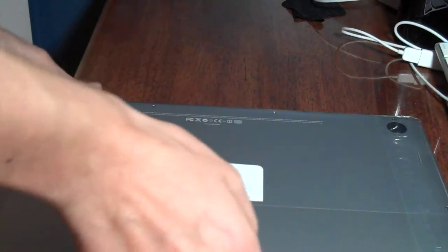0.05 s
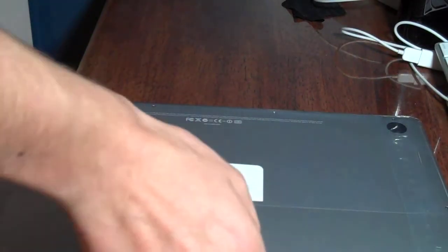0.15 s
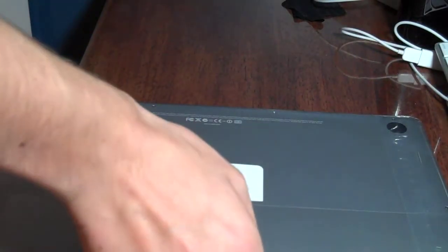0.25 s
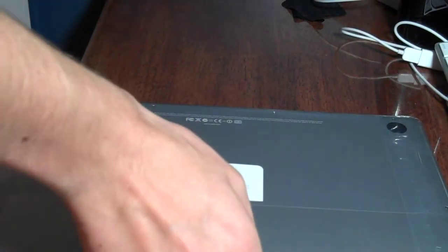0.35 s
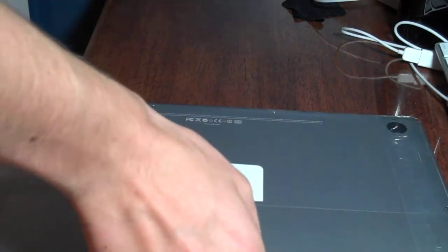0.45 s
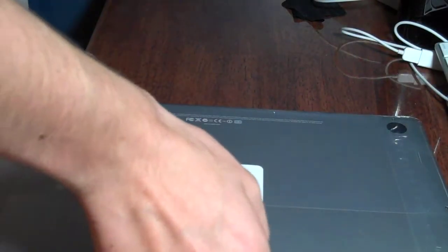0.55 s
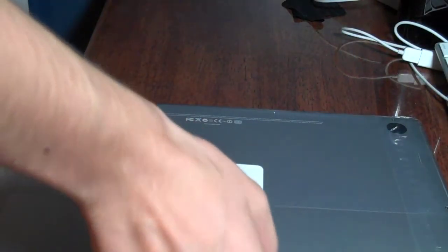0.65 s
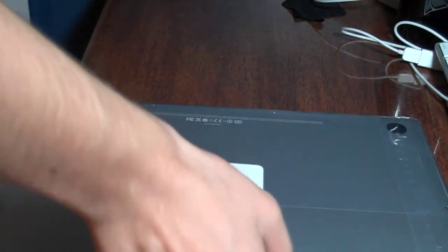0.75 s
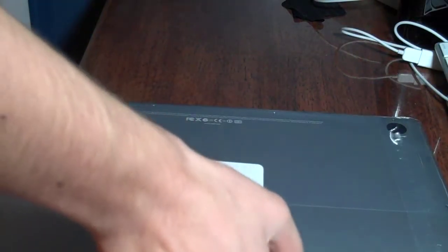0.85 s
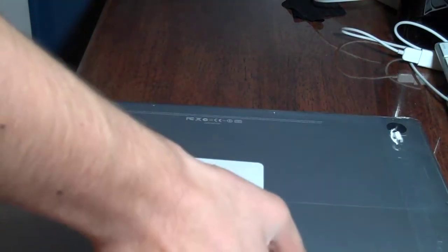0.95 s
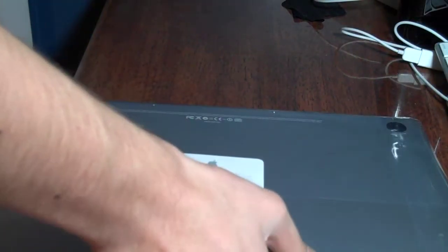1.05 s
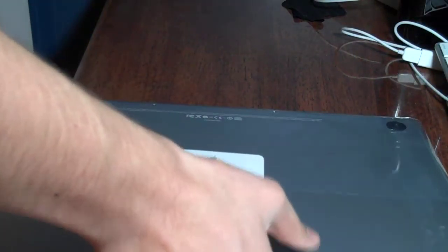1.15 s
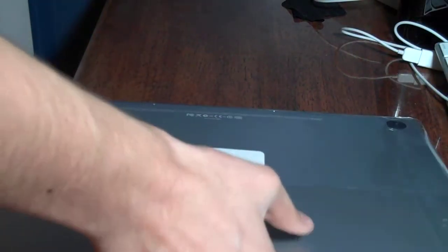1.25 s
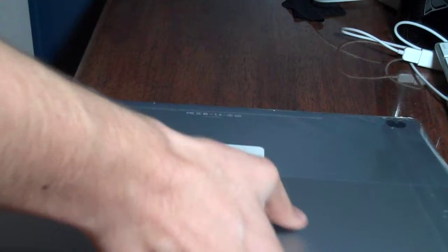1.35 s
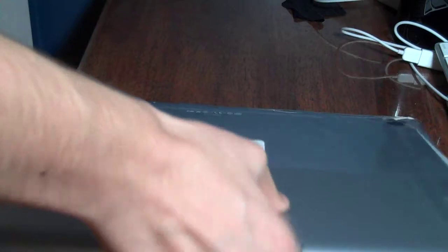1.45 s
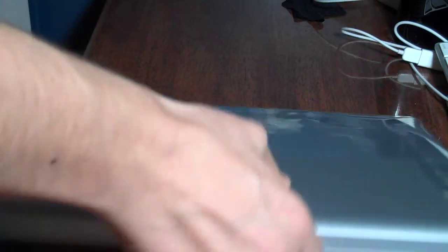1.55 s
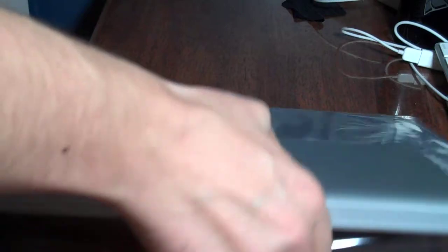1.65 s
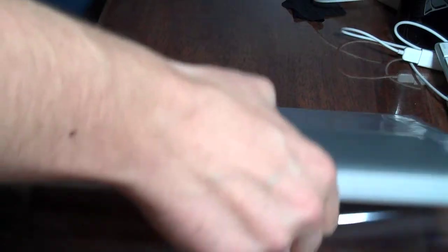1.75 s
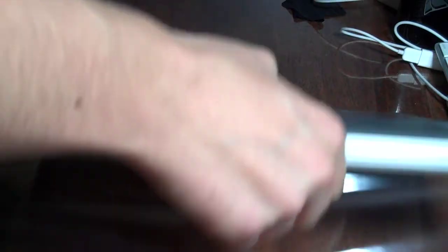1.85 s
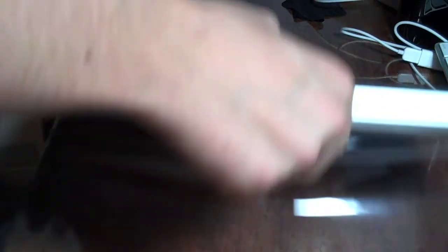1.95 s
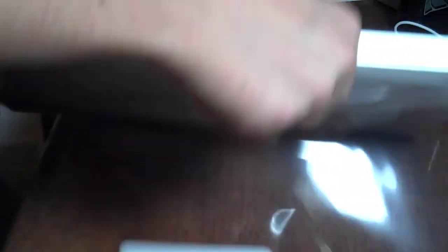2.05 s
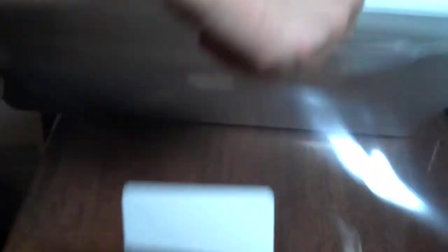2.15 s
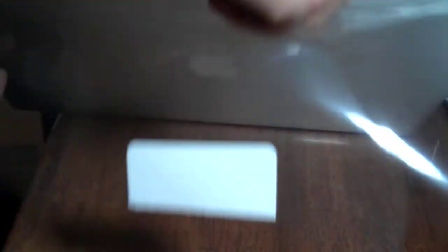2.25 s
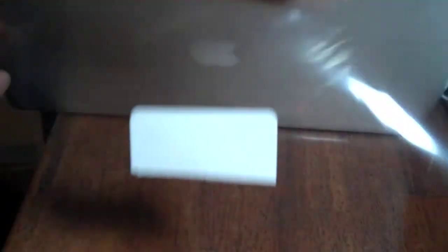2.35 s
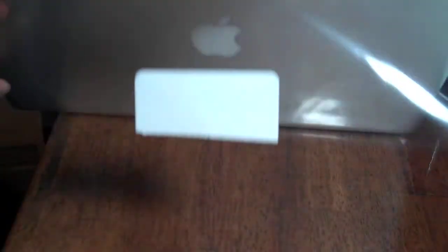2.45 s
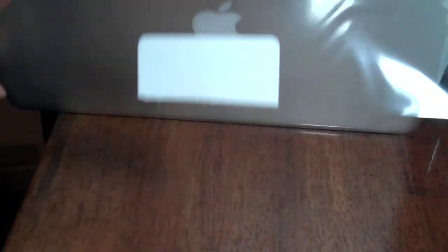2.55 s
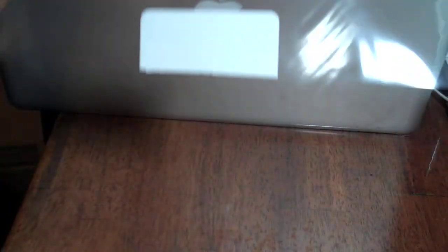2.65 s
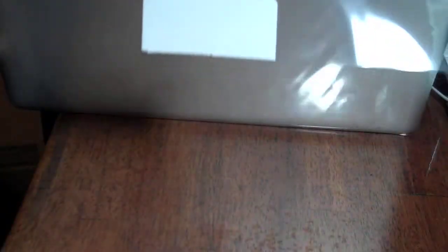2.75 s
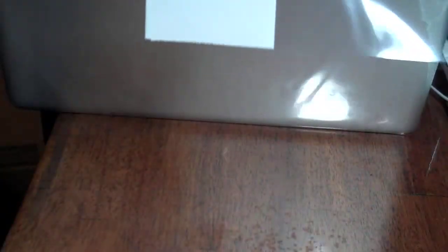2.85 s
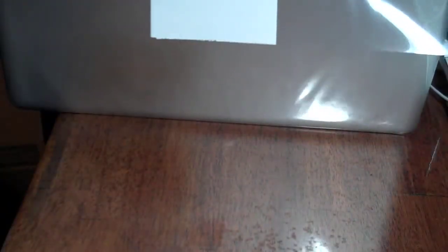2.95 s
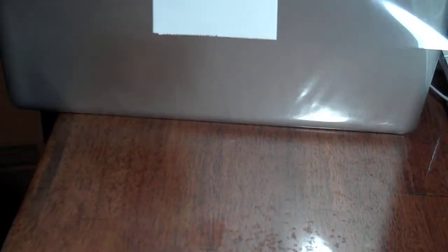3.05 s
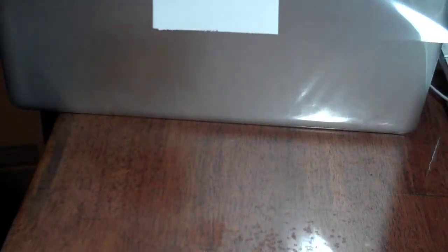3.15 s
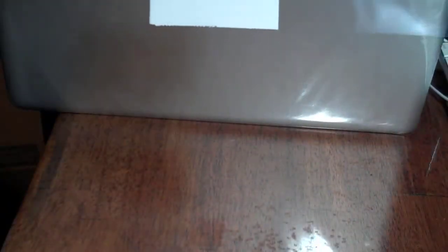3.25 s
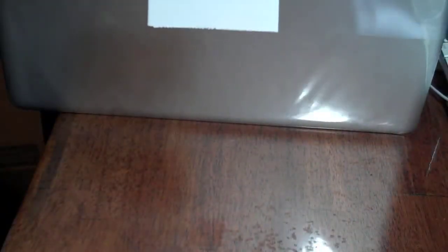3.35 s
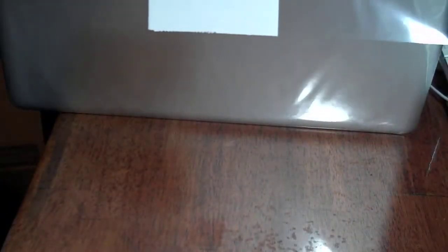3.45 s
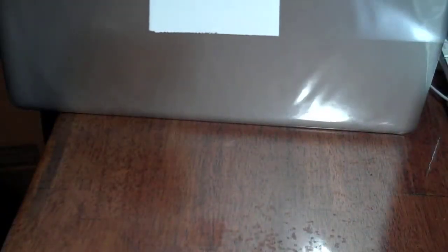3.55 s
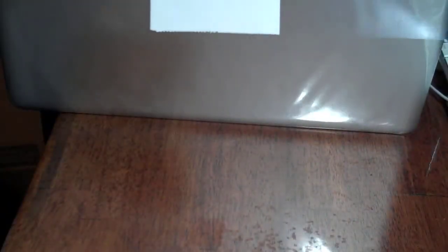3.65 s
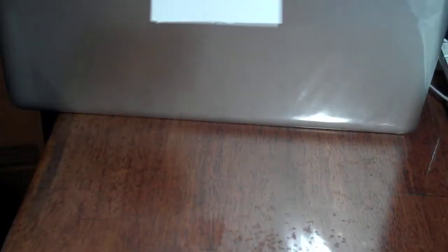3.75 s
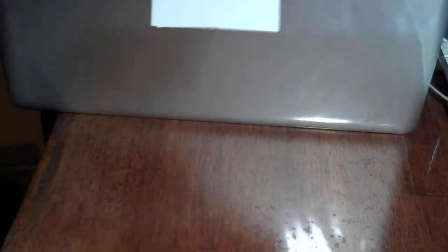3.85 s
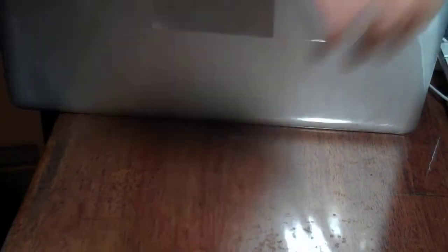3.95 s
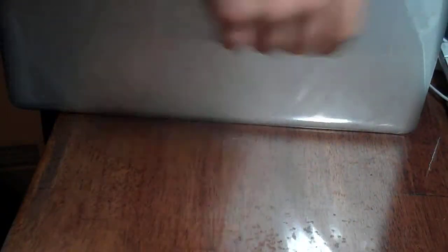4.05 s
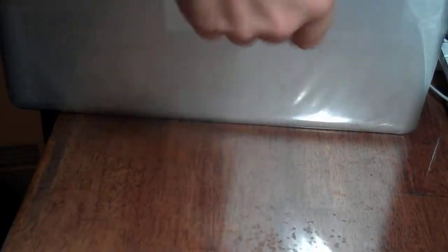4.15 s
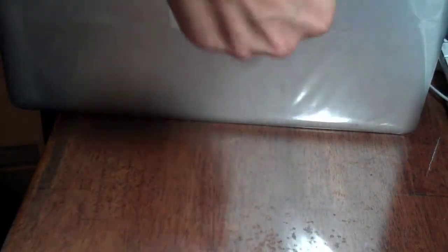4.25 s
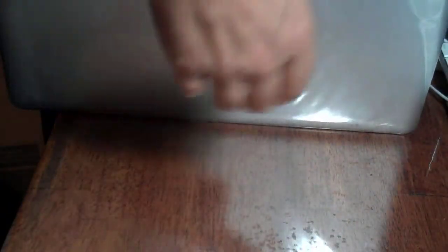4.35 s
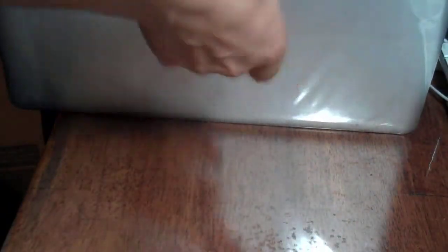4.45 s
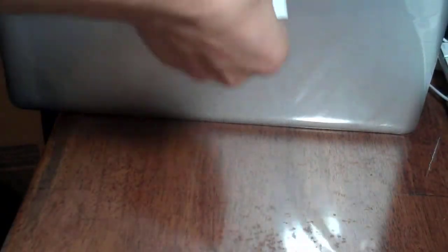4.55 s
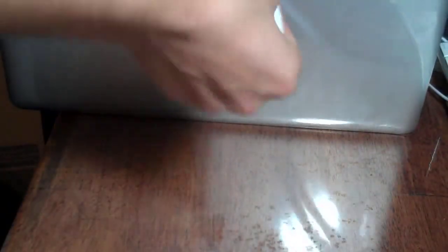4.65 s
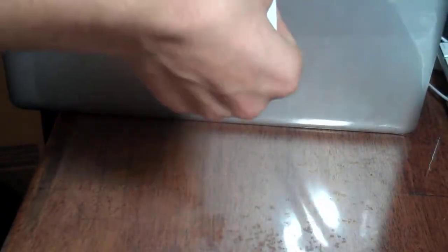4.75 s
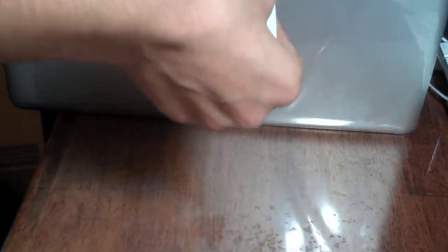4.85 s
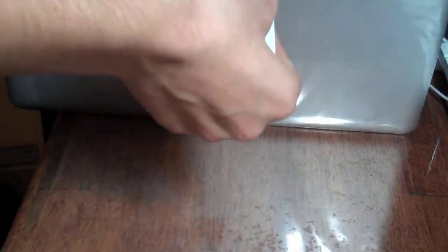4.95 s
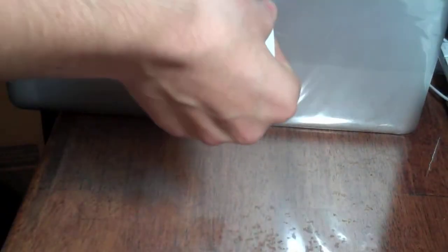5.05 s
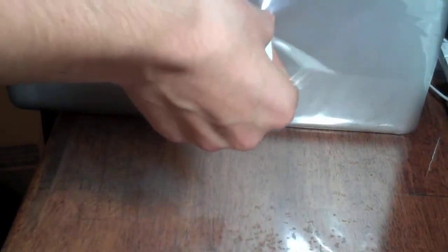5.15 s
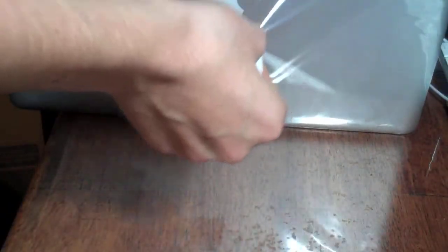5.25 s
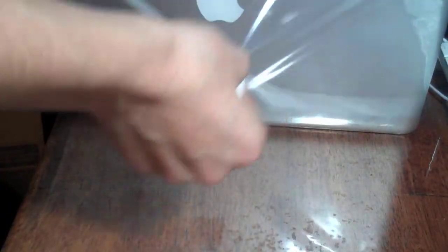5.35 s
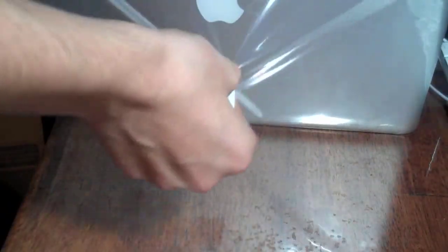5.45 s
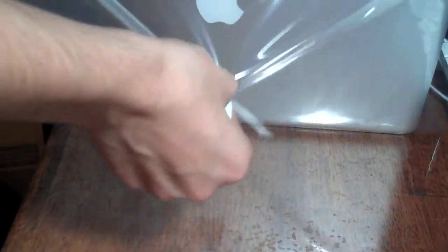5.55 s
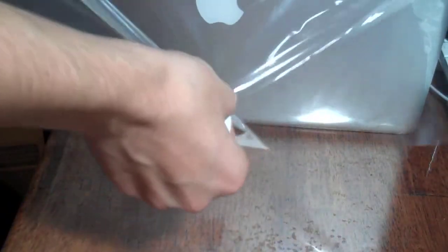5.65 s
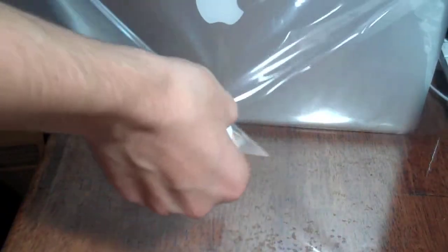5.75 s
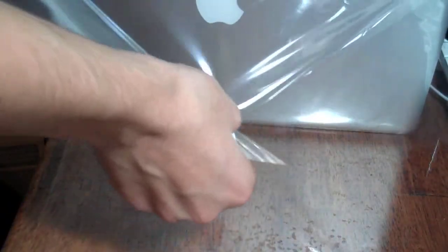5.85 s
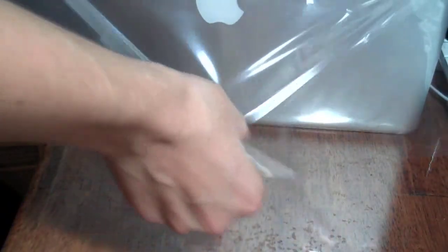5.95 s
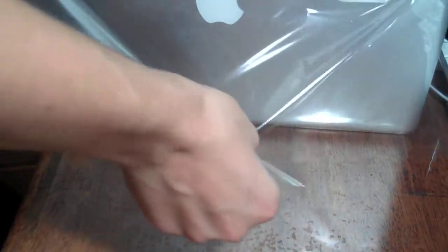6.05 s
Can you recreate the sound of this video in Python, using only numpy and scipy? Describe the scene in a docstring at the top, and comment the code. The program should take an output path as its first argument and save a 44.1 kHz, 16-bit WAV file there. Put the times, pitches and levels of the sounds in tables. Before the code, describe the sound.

Close to the microphone in a quiet room, hands work at the stiff plastic film on a laptop. Light ticks and rustles lead to a cluster of sharp crackles. The laptop rubs softly over a wooden desk and gives a short rising squeak. After a lull come more snaps and a quick falling squeak, then the film is pulled away in dense, crisp crinkling.

```python
"""Stiff clear film snaps and rustles as it is lifted off a laptop, rubbed and pulled near a microphone.
Creases give way in bursts of a few ms; friction hisses between them. Skin and film stick, slip
and squeak; the laptop's edge drags over the wooden desk. The metal shell rings along.
Behind: short reflections, quiet room tone, faint hum. The input's baseline jumps and settles."""
import sys
import numpy as np
from scipy import signal
from scipy.fft import rfft, irfft
from scipy.io import wavfile
from scipy.ndimage import uniform_filter1d

SR = 44100
rng = np.random.default_rng(int(sys.argv[2]) if len(sys.argv) > 2 else 0)


def digitize_waveform(pressure):
    """Quantize a signal to 16-bit integers and store it at the path in sys.argv[1].

    Rows of a 2-D input are taken as channels; values are limited to [-1, 1].
    """
    field = np.atleast_2d(pressure).T
    bounded = np.clip(field, -1, 1)
    quanta = np.round(bounded * 32767).astype(np.int16)
    wavfile.write(sys.argv[1], SR, quanta)


N = 269451

# crease snaps: t/s, peak energy/(dB per ms), centre/Hz, width/oct, thump energy/(dB per ms), burst/ms
CREASES = [(0.0007, -38, 2800, 1.2, -56, 10), (0.1971, -42, 5200, 2.3, -54, 8.4),
           (0.2124, -27.5, 4100, 1.02, -67, 2.7), (0.2343, -41.5, 3120, 1.7, -58, 2),
           (0.2462, -48, 2200, 1.8, -63, 5), (0.2914, -51, 3800, 1.5, -69, 1.2),
           (0.3002, -35.5, 5000, 0.76, -55, 0.47), (0.3067, -43, 4400, 2.3, -69, 1.9),
           (0.3342, -52, 2600, 1.7, -67, 2.6), (0.407, -53, 16400, 1.6, -58, 1.5),
           (0.523, -49, 16400, 1.8, -63, 29), (0.6126, -44.5, 12400, 1.2, -60, 1.4),
           (0.6861, -43, 6900, 1.74, -56, 0.57), (0.81, -59, 10600, 3, -74, 1.0),
           (0.8785, -53.5, 7000, 2.7, -78, 1.1), (0.9701, -39, 6100, 2.04, -54, 1.2),
           (1.0618, -41, 16400, 1.76, -76, 6.6), (1.1405, -48, 3370, 1.8, -69, 3.8),
           (1.1612, -46, 1320, 2, -91, 6.3), (1.1772, -37.5, 3640, 1.3, -66, 3.1),
           (1.1996, -19, 2860, 1.48, -33.5, 3.5), (1.209, -39, 2200, 4.4, -52, 1.4),
           (1.2196, -38, 6100, 3.1, -50, 2.2), (1.2585, -31, 6000, 1.56, -59, 1.7),
           (1.2656, -31, 16400, 2.2, -52, 1.8), (1.3267, -44, 2100, 1.45, -65, 5.8),
           (1.3584, -30.5, 4500, 1.5, -54, 4.8), (1.4218, -27, 3770, 1.7, -35, 2.5),
           (1.4436, -34.5, 2880, 1.07, -57, 2.6), (1.496, -28, 3250, 1.25, -53, 8.1),
           (1.5017, -51, 8600, 1.7, -65, 2.2), (1.549, -51.5, 4600, 2.2, -73, 2.5),
           (1.588, -47.5, 5300, 1.6, -74, 0.76), (1.6328, -59, 4500, 2.5, -60, 3.3),
           (1.9147, -59, 16400, 2.6, -73, 4.9), (1.9884, -46.5, 1410, 1.1, -62, 3.4),
           (2.018, -50, 700, 2.1, -54, 2.2), (2.0383, -36, 16400, 3.7, -42.5, 0.94),
           (2.0488, -31.5, 16400, 4.2, -34.5, 3.3), (2.2317, -44, 16400, 1.7, -61, 1.2),
           (2.2573, -37.5, 16400, 2.9, -62, 2.2), (2.3992, -48, 4180, 1.3, -63, 10.4),
           (2.727, -48, 16400, 2.1, -73.5, 2.4), (2.833, -53.5, 1210, 0.98, -56, 2.7),
           (3.1386, -41, 1720, 1.57, -51.5, 2.5), (3.5019, -44, 2630, 0.9, -53.5, 1.4),
           (3.6572, -38.5, 1920, 1.8, -58, 8.1), (3.6716, -33, 2730, 1.36, -67, 1.4),
           (3.6746, -28.5, 7150, 0.73, -52, 2.4), (3.719, -28.5, 1900, 1.4, -38.5, 7.9),
           (3.739, -37.5, 3240, 1.26, -49, 6.2), (3.894, -33.5, 3320, 1.06, -60, 3.5),
           (3.9518, -35, 706, 1.27, -58, 12), (4.1477, -58.5, 16400, 6.5, -67, 19),
           (4.3577, -54, 16400, 2.6, -67, 28), (4.3863, -50, 5300, 4.9, -54, 1.3),
           (4.3914, -26.5, 10600, 5, -32.5, 5.3), (4.3994, -41, 16400, 3, -43, 1.2),
           (4.4785, -32.5, 2260, 1.37, -49, 5.2), (4.503, -48, 1700, 2.3, -57, 6.2),
           (4.5225, -46, 1500, 1.2, -53, 1.7), (4.5413, -36, 2600, 1.1, -59, 1.6),
           (4.583, -41, 2100, 1.1, -58, 4.9), (4.7259, -47, 4600, 1.6, -67, 1.4),
           (4.7733, -53.5, 714, 3.3, -55, 2.9), (4.7962, -36, 4220, 1.36, -75, 0.9),
           (4.8292, -30, 3170, 1.68, -52, 4.7), (4.863, -37, 1400, 1.2, -54, 1.1),
           (4.8852, -21.5, 3600, 1.72, -31, 2.7), (4.9708, -44, 4400, 1.7, -68, 2.3),
           (5.015, -48, 6600, 1.3, -78, 1.2), (5.0306, -45, 7400, 1.4, -68, 1),
           (5.0693, -32, 2120, 1.44, -58, 4.8), (5.0815, -21.5, 4230, 0.52, -71, 2.4),
           (5.0925, -42, 4500, 3.5, -53, 3.4), (5.1048, -50, 5400, 1.0, -53, 1.2),
           (5.1223, -32, 5300, 1.3, -55, 1.2), (5.139, -29.5, 4640, 0.95, -52, 2.0),
           (5.149, -42, 4000, 2.3, -72, 1.4), (5.1665, -25, 5130, 2.14, -31.5, 2.9),
           (5.1835, -41, 3000, 2.0, -59, 1.3), (5.189, -27.5, 16900, 3.7, -44, 5.4),
           (5.2206, -51, 7100, 1.5, -67, 2.2), (5.2332, -34, 8100, 1.3, -70, 4.9),
           (5.2411, -29, 4200, 1.5, -50, 5.2), (5.2487, -25, 16400, 1.9, -51, 1.8),
           (5.2554, -25.5, 4050, 2.76, -36.5, 1.45), (5.2743, -35, 11700, 1.7, -65, 1.5),
           (5.2897, -38, 6500, 1.4, -75, 1.9), (5.304, -32.5, 2600, 1.4, -53, 7.6),
           (5.312, -31.5, 5370, 2.1, -67, 9.0), (5.317, -22.5, 5800, 1.85, -33.5, 2.6),
           (5.3275, -34, 3400, 1.9, -58, 1.9), (5.3407, -31.5, 3080, 1.2, -57, 1.7),
           (5.3619, -20.5, 4470, 1.8, -37, 6.2), (5.4607, -28.5, 9100, 3.2, -35, 1),
           (5.4793, -40, 7800, 1.2, -69, 2.2), (5.5101, -39, 4000, 1.66, -69, 4.8),
           (5.5198, -40, 16400, 2.5, -71, 3.5), (5.5538, -46.5, 4000, 1.8, -74, 4.1),
           (5.5789, -32, 12100, 2.17, -49, 5), (5.6339, -34.5, 3500, 2.1, -65, 5.7),
           (5.664, -40, 16400, 1.6, -76, 2.4), (5.6771, -47, 16400, 1.9, -76, 1.4),
           (5.699, -38, 4200, 1.4, -77, 1.5), (5.7193, -30.5, 6500, 1.1, -45, 2.7),
           (5.7982, -34.5, 4100, 1.25, -69, 29), (5.8256, -40, 16400, 2.3, -80, 2.0),
           (5.8562, -24.5, 6400, 2.74, -32, 2.26), (5.8964, -34, 7000, 1.6, -72, 11),
           (5.9256, -44, 7300, 1.7, -72, 2.5), (5.9298, -25.5, 8900, 2.16, -42.5, 3.9),
           (5.9355, -38.5, 2900, 1.7, -63, 2.9), (5.97, -38, 16400, 2.5, -77, 3.5),
           (5.976, -37, 4700, 1.7, -63, 3.4), (5.9922, -26.5, 3920, 3.25, -41, 2.4),
           (6.0789, -28, 3000, 2.16, -38, 1.9)]
# snap bands: low/Hz, high/Hz
SNAP_BANDS_HZ = [(65, 500), (500, 1200), (1200, 2500), (2500, 5000), (5000, 9000), (9000, 17000)]
# sheet and desk wash, one row per snap band: energy/dB re a 3 ms snap, t60/s
WASH = [(-20.5, 0.064), (-8, 0.05), (-7, 0.1), (-6, 0.071), (-4.5, 0.076), (-3.5, 0.092)]
# hand and film rubs: t/s at full level, rise/s, hold/s, fall/s, level/dB, centre/Hz, width/oct
RUB_STROKES = [(0, .01, 0.012, 0.13, -65.5, 3030, 1.2), (0.153, 0.3, 0.016, 0.069, -62, 11100, 1.6),
               (0.222, 0.04, .02, 0.094, -56.5, 2500, 1.9), (0.314, 0.028, 0.029, 0.065, -59.5, 3930, 1.2),
               (0.402, 0.097, .2, .15, -70, 4030, 2.2), (0.542, 0.037, 0.024, 0.028, -59, 6500, 0.58),
               (.8, .06, .12, .06, -79, 9000, 1.9), (0.678, 0.073, 0.055, 0.075, -68.5, 1100, 3),
               (0.935, 0.21, 0.045, 0.22, -66, 1840, 1.95), (1.184, 0.088, 0.058, 0.21, -59.5, 6000, 4),
               (1.43, 0.19, 0.096, 0.083, -63, 3030, 6.2), (1.666, 0.051, 0.021, 0.038, -62.5, 9000, 2),
               (1.783, 0.095, 0.15, 0.075, -76, 3520, 1.6), (2.06, 0.022, .01, 0.076, -57, 12000, 1.2),
               (1.983, .08, 0.15, .05, -68, 7000, 2.5), (2.13, 0.044, 0.16, 0.77, -57.5, 1270, 1.18),
               (2.13, 0.048, 0.11, 0.46, -59.5, 7000, 1.8), (2.618, 0.24, 0.015, 0.062, -52, 5000, 1.5),
               (2.85, 0.14, 0.37, 0.26, -78.5, 893, 1.3), (3.397, 0.069, 0.18, 0.3, -71, 2042, 2.6),
               (3.718, 0.14, 0.019, 0.11, -49, 1370, 1.56), (3.98, 0.3, 0.059, 0.14, -55.5, 2700, 1.7),
               (4.415, 0.054, 0.0071, 0.067, -52.5, 13000, 3.1),
               (4.514, 0.11, 0.16, 0.061, -54.5, 1270, 1.5), (4.611, 0.023, 0.057, .05, -40.5, 3470, 1.33),
               (4.914, .05, .01, 0.061, -48.5, 5070, 0.87), (5.174, 0.073, 0.018, 0.084, -47.5, 5000, 1.4),
               (5.373, 0.19, .01, 0.083, -51, 2030, 1.7), (5.512, 0.047, 0.067, 0.31, -61.5, 4000, 2.3),
               (5.854, 0.097, .03, .05, -58, 6000, 1.5), (5.946, .05, 0.025, 0.062, -52, 2500, 1.4),
               (6.028, 0.079, 0.1, .05, -50.5, 5600, 1.45)]
# rustle bands: low/Hz, high/Hz
RUSTLE_BANDS_HZ = [(380, 800), (800, 2000), (2000, 5000), (5000, 9000), (9000, 17000)]
# stick-slip strokes: roughness/0-1 (start, end), slope/dB per overtone (start, end), [t/s, f/Hz, level/dB]
SLIP_STROKES = [ ((.4, 0.15), (-8, -14), [(.638, 1390, -72), (.65, 1200, -60), (.67, 1074, -74),
                (.7, 1267, -69), (.715, 1122, -58.5), (.745, 1117, -63)]), ((0.14, 0.48), (-1, -7),
                [(2.125, 390, -59), (2.14, 414.3, -54), (2.16, 469.5, -52), (2.185, 385.3, -52.5),
                (2.22, 396, -68), (2.29, 504.6, -57.5), (2.4, 438.3, -62), (2.51, 510, -69)]),
                ((.07, 0.031), (2, -3.5), [(2.54, 523, -72), (2.575, 769, -52.5), (2.595, 863, -55),
                (2.622, 975, -49), (2.634, 1176, -36.5), (2.643, 1174, -41), (2.655, 1170, -66),
                (2.672, 1260, -74)]), ((0.059, .1), (-12, -10), [(3.921, 5150, -40), (3.925, 4520, -36.5),
                (3.932, 4510, -45), (3.939, 5870, -39), (3.942, 7450, -45), (3.947, 7800, -49)]),
                ((0.027, 0.63), (-20.5, 1.6), [(4.598, 4520, -49), (4.604, 4690, -38), (4.609, 4670, -47),
                (4.616, 4774, -24), (4.621, 4326, -58), (4.625, 3480, -27), (4.634, 3460, -39),
                (4.64, 2630, -27.5), (4.652, 1762, -33), (4.662, 1363, -32.5), (4.69, 1320, -74)]),
                ((0.35, 0.11), (-20, -20), [(5.204, 11100, -36), (5.208, 12000, -32), (5.213, 10270, -30.5),
                (5.217, 10050, -33), (5.223, 13000, -34)]), ((.03, 0.18), (-2.6, 5), [(5.772, 4700, -60),
                (5.778, 5150, -36.5), (5.784, 4670, -55), (5.79, 4960, -47), (5.798, 4710, -43)])]
# laptop shell modes: f/Hz, width/Hz, gain/dB
SHELL_MODES = [(237, 68, -2), (405, 15.5, 3.5), (548, 20, -2.5), (614, 28, -1.5), (684, 59, -1.5),
               (841, 24, -9), (1450, 7.7, -55), (2097, 240, -16.5), (3120, 930, -15.5)]
# room decay: f/Hz, t60/s
ROOM_DECAY = [(250, 0.018), (1000, 0.13), (4000, 0.19), (12000, 0.12)]
# room tone spectrum: f/Hz, relative level/dB
AIR_SPECTRUM = [(18, -24), (30, 3), (49, -11), (124, -16.5), (165, -11), (529, -5), (865, -11),
                (1040, -11.5), (3240, -19.5), (3980, -22.5), (12700, -30), (14500, -30)]
# baseline drops: t/s, drop/full scale
BASELINE_DROPS = [(0.969, 0.0038), (1.204, 0.0095), (1.268, 0.0031), (1.424, 0.0027), (2.048, 0.0067),
                  (3.677, .0033), (4.389, 0.015), (4.655, 0.0035), (4.883, 0.0065), (5.168, 0.0071),
                  (5.209, 0.0081), (5.258, .0072), (5.316, 0.0014), (5.365, .0045), (5.46, 0.0016),
                  (5.856, 0.0021), (5.935, 0.0017), (5.993, 0.0013)]
# baseline climbs in even steps: first step/s, last step/s
BASELINE_CLIMBS = [(.016, .084), (1.942, 2.01), (2.611, 2.748), (4.03, 4.03)]

ROOM_DB, AIR_DB, HUM_DB = -14.5, -67.5, -81
HUM_HZ, CUTOFF_HZ = 119, 14200


def crease_snaps(thump_db_per_oct=-2, wash_delay_s=.00044, wash_rise_s=.0014):
    """A crease gives way: crack cluster, air puff, then a dying wash, stronger after long bursts."""
    starts_s, peak_db, centre_hz, width_oct, thump_db, burst_ms = np.vstack([CREASES, faint_creases()]).T
    t, out = np.arange(1800) / SR, np.zeros(N)
    fade = np.exp(-(1000 * t / np.clip(burst_ms[:, None], .2, 25)) ** 2) * np.minimum(t / .0001, 1)
    grain, size = rng.standard_normal((len(starts_s), len(t), 2)).transpose(2, 0, 1)
    cracks = fade * (grain * gain_of(5.7 * size) - .25)  # one-sided part: the puff
    wash = sheet_resonances(rng.standard_normal(N))
    for edges_hz, (wash_db, t60_s) in zip(SNAP_BANDS_HZ, WASH):
        bursts, energy = bandpass(cracks, edges_hz), np.zeros(N)
        bursts = bursts / np.sqrt((bursts ** 2).sum(1, keepdims=True) / SR * 1000)
        above_oct = np.log2(np.prod(edges_hz) / np.prod(SNAP_BANDS_HZ[0])) / 2
        crack_gain = gain_of(peak_db + hump_db(edges_hz, centre_hz, width_oct))
        thump_gain = gain_of(thump_db + thump_db_per_oct * above_oct)
        for at_s, gain, ms, burst in zip(starts_s, np.hypot(crack_gain, thump_gain), burst_ms, bursts):
            add(out, at_s, gain * burst)
            wash_energy = gain ** 2 * gain_of(2 * wash_db) * SR / 1000 * (ms / 3) ** .24
            add(energy, at_s + wash_delay_s, [wash_energy])
        rise, fall = np.exp(-1 / wash_rise_s / SR), np.exp(-2 * np.log(1000) / t60_s / SR)
        onsets = signal.lfilter([1 - rise], [1, -rise], energy)
        power = signal.lfilter([1 - fall], [1, -fall], onsets)
        out += np.sqrt(abs(power)) * unit_rms(bandpass(wash, edges_hz))
    return out


def faint_creases(rate_per_s=8, until_s=1.15, mean_db=-58, spread_db=3):
    """Small creases tick at random as fingers feel for the edge; rows as in CREASES."""
    when, size, pitch = rng.random((round(rate_per_s * until_s), 3)).T
    peak_db = mean_db + spread_db * (2 * size - 1)
    width_oct = burst_ms = np.full(len(when), 1.5)
    return np.transpose([when * until_s, peak_db, 6000 * 2.5 ** pitch, width_oct, peak_db - 25, burst_ms])


def rustle(edge_db=-20, ticks_per_s=2500):
    """Friction hiss in clumps, with tiny uneven crackles; each rub swells, holds and fades."""
    full_s, rise_s, hold_s, fall_s, level_db, centre_hz, width_oct = np.transpose(RUB_STROKES)[:, :, None]
    t, grid_s = np.arange(N) / SR, np.arange(0, N, 64) / SR
    outside_hold = np.maximum((full_s - grid_s) / rise_s, (grid_s - full_s - hold_s) / fall_s)
    power = gain_of(2 * (level_db + edge_db * np.maximum(outside_hold, 0)))
    clumps = gain_of(.58 * wander(N, 150) + 1.9 * wander(N, 1200))
    ticks = rng.standard_normal(N) * gain_of(1.9 * np.minimum(rng.exponential(1, N), 5))
    ticks *= rng.random(N) < ticks_per_s / SR
    friction = clumps * (.19 * unit_rms(ticks) + sheet_resonances(rng.standard_normal(N)))
    friction /= np.sqrt(uniform_filter1d(friction ** 2, 4000))  # the hand sets the slow level
    out = np.zeros(N)
    for edges_hz in RUSTLE_BANDS_HZ:
        band_power = (power * gain_of(2 * hump_db(edges_hz, centre_hz, width_oct))).sum(0)
        out += np.interp(t, grid_s, np.sqrt(band_power)) * unit_rms(bandpass(friction, edges_hz))
    return out


def sheet_resonances(x, depth_db=3.5):
    """The loose sheet's narrow resonances shift as it bends."""
    spectra = signal.stft(x, nperseg=1024)[2]
    patches = uniform_filter1d(rng.standard_normal(spectra.T.shape), size=8, axis=0)
    patches = unit_rms(uniform_filter1d(patches, size=3, axis=1))
    return unit_rms(signal.istft(spectra * gain_of(depth_db * patches.T), nperseg=1024)[1][:N])


def squeak(roughness, slope_db, path):
    """Regular slips stack overtones; roughness jitters timing and size. Returns start/s, sound."""
    knots_s, *columns = np.transpose(path)
    t = np.arange(knots_s[0], knots_s[-1], 1 / SR)
    hz, level_db = (np.interp(t, knots_s, column) for column in columns)
    n, period_samples = len(t), SR / hz.mean()
    slope_db, rough = np.linspace(*slope_db, n), np.linspace(*roughness, n)
    jitter = .328 * wander(n, period_samples) + .058 * wander(n, 6 * period_samples)
    phase_rad = 2 * np.pi * np.cumsum(hz * (1 + rough * jitter)) / SR
    stack = sum(gain_of(slope_db * (k - 1)) * (k * hz < CUTOFF_HZ) * np.cos(k * phase_rad + .685 * k * k)
                for k in range(1, 11))
    gain = gain_of(level_db + 6 * rough * wander(n, period_samples))
    return knots_s[0], gain * unit_rms(stack) * signal.windows.tukey(n, .05)


def shell_ring(x):
    """The metal shell rings along at its own modes."""
    return sum(gain_of(db) * signal.lfilter(*signal.iirpeak(hz, hz / width_hz, SR), x)
               for hz, width_hz, db in SHELL_MODES)


def reflections(x, onset_s=.00046):
    """Desk, lid and near walls: dense echoes, each band dying at its own rate."""
    hz, t, spectra = signal.stft(rng.standard_normal(SR // 2), SR, nperseg=128)
    decay = gain_of(-60 * t / log_interp(ROOM_DECAY, hz)[:, None])
    tail = signal.istft(spectra * decay, SR, nperseg=128)[1]
    tail *= np.clip(np.arange(len(tail)) / SR / onset_s - .5, 0, 1)
    return signal.fftconvolve(x, tail / np.linalg.norm(tail))[:N]


def room_tone():
    """Room noise and microphone hiss, with a faint wavering hum."""
    shape = gain_of(log_interp(AIR_SPECTRUM, np.fft.rfftfreq(N, 1 / SR)))
    hiss = unit_rms(irfft(rfft(rng.standard_normal(N)) * shape, N))
    hum = np.sqrt(2) * np.sin(2 * np.pi * HUM_HZ * np.arange(N) / SR)
    return gain_of(AIR_DB + .83 * wander(N, 4000)) * hiss + gain_of(HUM_DB + .47 * wander(N, 6820)) * hum


def baseline(step_s=.034, step_fs=.0035, opening_fs=.0079, rest_fs=-.00036, settle_s=.1):
    """The input's offset jumps and settles through its coupling; fs = full scale."""
    steps = [(at_s, step_fs) for first_s, last_s in BASELINE_CLIMBS
             for at_s in np.arange(first_s, last_s + step_s / 2, step_s)]
    drops = [(at_s, -drop_fs) for at_s, drop_fs in BASELINE_DROPS]
    kicks = np.zeros(N)
    for at_s, jump_fs in [(.00094, opening_fs)] + steps + drops:
        add(kicks, at_s, np.full(8, jump_fs / 8))
    return rest_fs + signal.lfilter([1], [1, -np.exp(-1 / settle_s / SR)], kicks)


def hump_db(edges_hz, centre_hz, width_oct, skirt_db=-6, floor_db=-45):
    """Band gain under a broad hump, skirt_db at one width off centre."""
    offset_oct = np.log2(np.sqrt(np.prod(edges_hz)) / centre_hz)
    return np.maximum(skirt_db * (offset_oct / width_oct) ** 2, floor_db)


def gain_of(db):
    return 10 ** (np.asarray(db) / 20)


def unit_rms(x):
    return x / np.sqrt(np.mean(x ** 2) + 1e-20)


def log_interp(table, hz):
    knots_hz, values = np.transpose(table)
    return np.interp(np.log(hz + 1), np.log(knots_hz + 1), values)


def add(mix, at_s, sound):
    part = mix[round(at_s * SR):][:len(sound)]
    part += sound[:len(part)]


def bandpass(x, edges_hz):
    return signal.sosfilt(signal.butter(3, edges_hz, "bandpass", fs=SR, output="sos"), x)


def wander(n, smooth_samples):
    """Smooth random wobble, rms 1."""
    return unit_rms(uniform_filter1d(rng.standard_normal(n), max(int(smooth_samples), 1)))


def scene():
    """Snaps and squeaks with reflections, rustle and shell ring, over room tone."""
    squeaks = np.zeros(N)
    for stroke in SLIP_STROKES:
        add(squeaks, *squeak(*stroke))
    sharp = crease_snaps() + bandpass(squeaks, (330, 16000))  # small rubbing surfaces radiate no bass
    film = sharp + gain_of(ROOM_DB) * reflections(sharp) + rustle()
    return (film + shell_ring(film) + room_tone())[None]


def record(dry):
    """Input stage: shifting baseline, then low-pass."""
    lowpass = signal.firwin(201, CUTOFF_HZ, window=("kaiser", 8), fs=SR)
    return signal.oaconvolve(dry + baseline(), lowpass[None], "same")


dry = scene()
out = record(dry)
digitize_waveform(out)
```